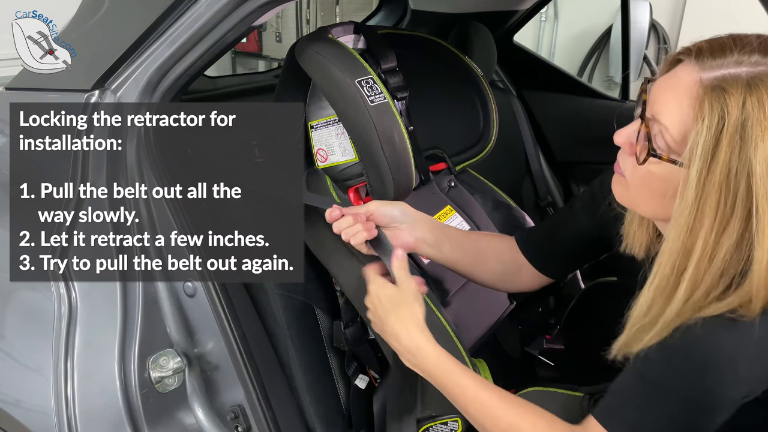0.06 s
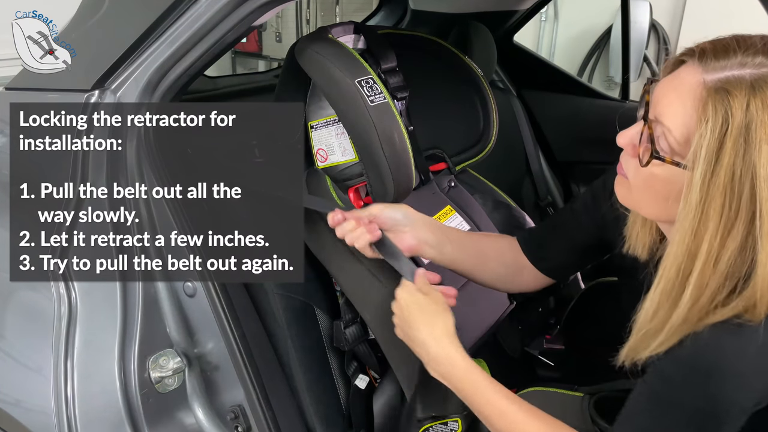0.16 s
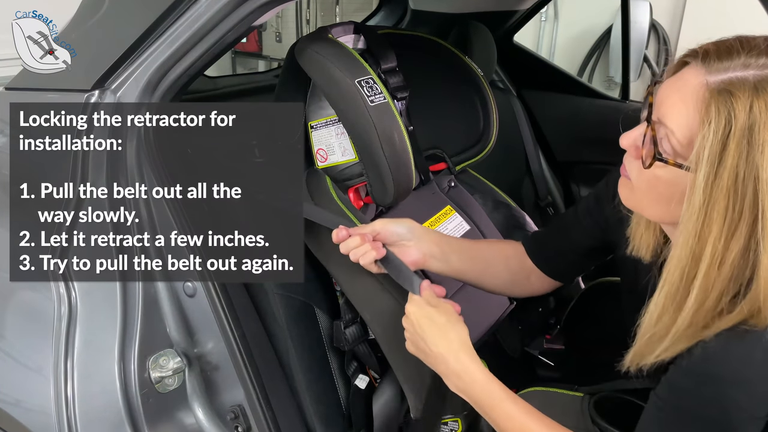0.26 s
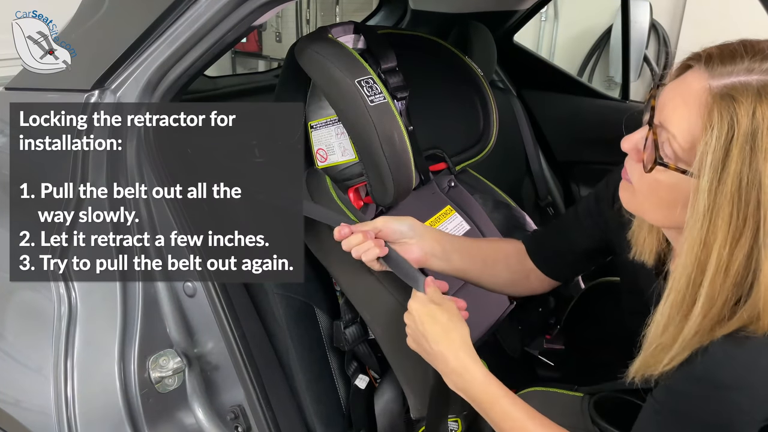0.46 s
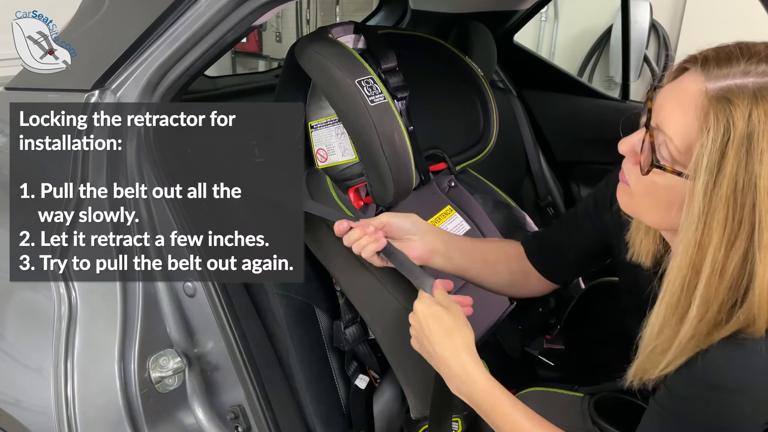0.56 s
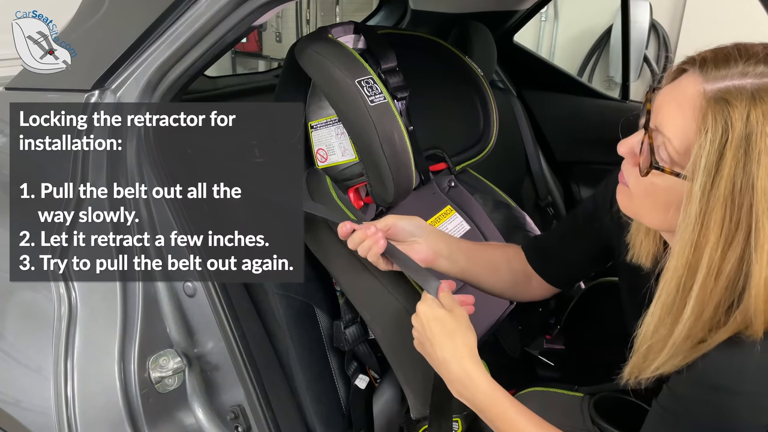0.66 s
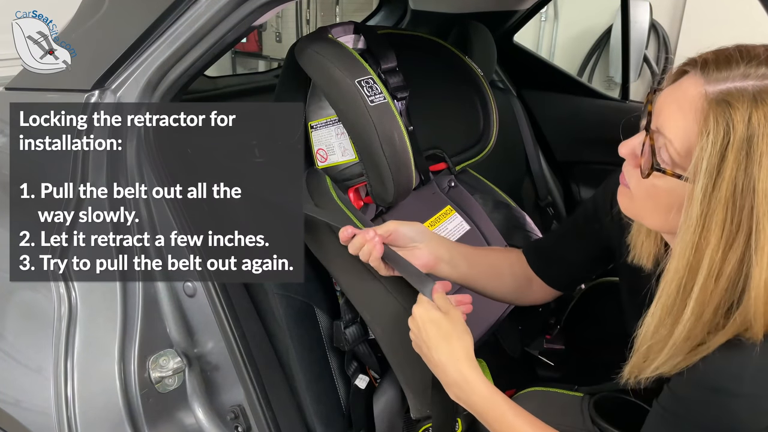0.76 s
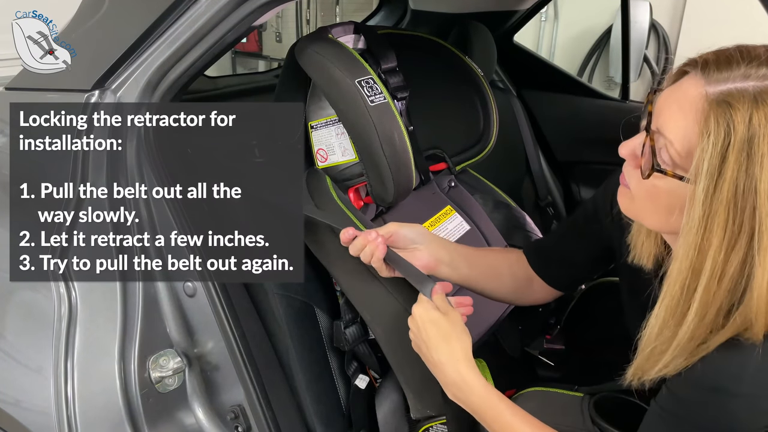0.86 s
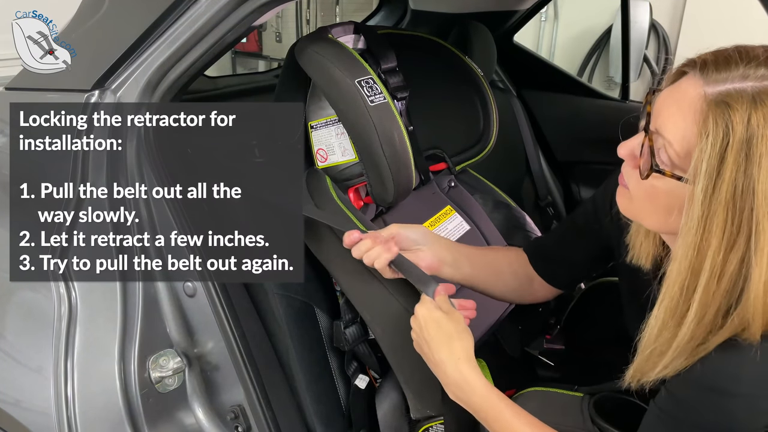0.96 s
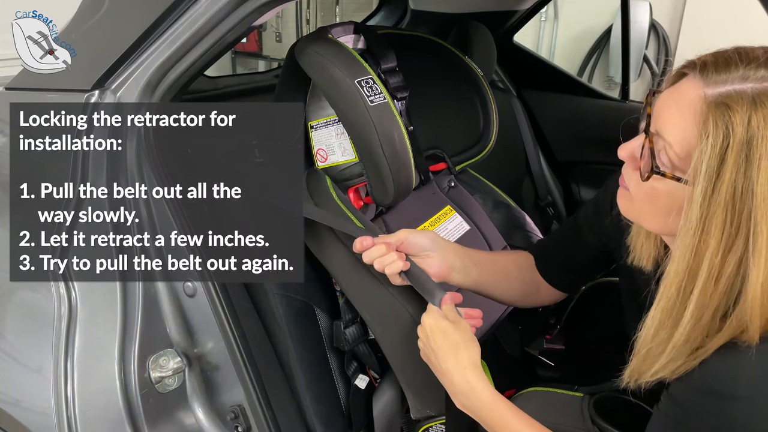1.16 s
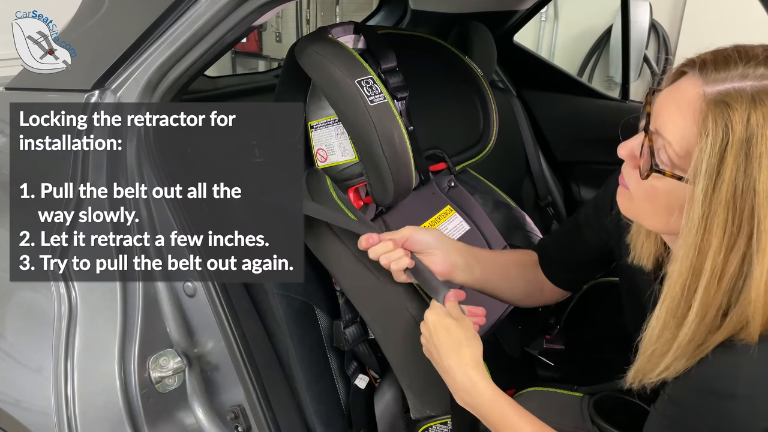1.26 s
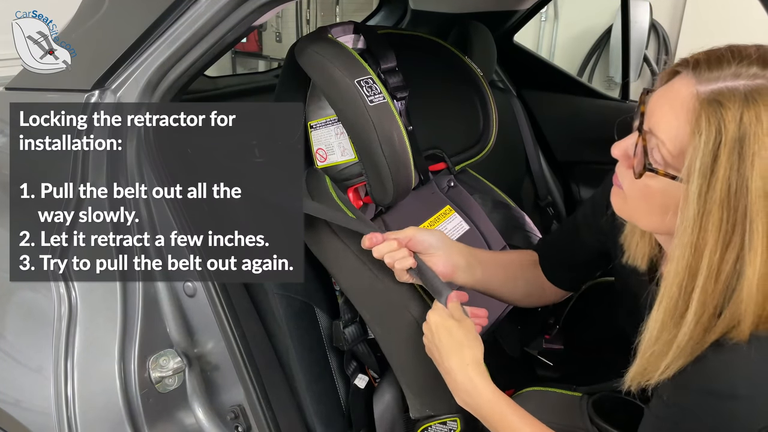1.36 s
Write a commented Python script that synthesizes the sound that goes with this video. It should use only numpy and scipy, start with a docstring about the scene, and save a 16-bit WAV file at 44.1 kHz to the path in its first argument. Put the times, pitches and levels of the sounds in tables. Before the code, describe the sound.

Seat belt tugged inside a parked car: sharp clack, short zip, dull clack.

```python
"""Inside a parked car, door open, one microphone close to a seat belt worked by hand.
The webbing goes taut against the trim with a soft thud and the retractor's pawl catches with a sharp
clack. A short length of belt zips through its guide as the spool turns, then a second tug seats the lock
with a duller clack. Cloth rustles faintly; a low rumble lies behind it all."""
import sys
import numpy as np
from scipy import signal
from scipy.fft import rfft, irfft
from scipy.io import wavfile

SR = 44100
rng = np.random.default_rng(int(sys.argv[2]) if len(sys.argv) > 2 else 0)


def store_wav(level_fs):
    """Save 16-bit WAV to argv[1]."""
    pcm = np.round(np.clip(np.atleast_2d(level_fs), -1, 1) * 32767)
    wavfile.write(sys.argv[1], SR, pcm.T.astype(np.int16))


N = 61739
T = np.arange(N) / SR

# Levels in the tables are relative; a spectrum gives the level per hertz.
# low rumble behind the scene: (frequency [Hz], level [dB])
RUMBLE_SPECTRUM = [(25, 0.5), (50, -6.5), (80, -5.5), (120, -7), (170, -16), (280, -18.5), (450, -28.5),
                   (1000, -33), (2000, -38), (5000, -43), (10000, -49), (16000, -52)]
# reverberation of the cabin and the space around it: (frequency [Hz], level [dB], t60 [s])
CABIN_REVERB = [(148, -2, .5), (420, -1, .5), (1040, -4.5, 0.56), (1640, -4.5, 0.59), (2920, -5, 0.55),
                (7400, -6, 0.31), (15000, -10, 0.21)]
# cloth sliding under the hands: (time [s], half-width [s], level [dB])
CLOTH_SWELLS = [(0.131, 0.026, -55.5), (.235, .028, -53), (0.533, 0.017, -60.5), (1.351, 0.017, -56)]
# its hiss: (frequency [Hz], level [dB])
CLOTH_SPECTRUM = [(500, 15), (2000, 2), (5000, 2), (10000, 3.5), (13000, -10), (15500, 2.5)]
# light ticks of the plastic fittings: (time [s], level [dB])
FITTING_TICKS = [(0.526, -50.5), (0.546, -51), (1.337, -47)]
# their colour: (frequency [Hz], level [dB])
TICK_SPECTRUM = [(800, 6), (3000, -0.5), (5500, -9), (8500, 4.5), (11000, -9), (15500, -3)]
# rumble of the turning spool: (time [s], level [dB])
SPOOL_LEVEL = [(.62, -28), (.685, -12.5), (.698, -0.5), (.73, -8), (.757, -1.5), (.79, -7), (.83, -6),
               (.9, -45)]
# its resonances: (frequency [Hz], level [dB], t60 [s])
SPOOL_MODES = [(166, -13, 0.053), (207, -4.5, .08), (279, -0.5, .08), (400, -7.5, 0.014),
               (597, -8.5, 0.021), (770, -3.5, 0.023), (1150, -5.5, 0.025)]
# thrum of the stretched webbing: (time [s], pitch [Hz], level [dB])
THRUM_CURVE = [(0.691, 290, -39), (0.717, 276.7, -33), (0.739, 216.4, -37.5), (0.758, 164, -26),
               (0.779, 166, -34), (0.828, 160, -39)]
# friction of the running belt, following its speed: (time [s], level [dB])
FRICTION_LEVEL = [(.66, -30), (.685, -18), (.708, -17.5), (.716, -2.5), (.765, 1.5), (.795, 0.5),
                  (.815, -4), (.835, -13), (.89, -62)]
# rasp of webbing on the guide: (frequency [Hz], level [dB])
WEBBING_SPECTRUM = [(400, 7.5), (900, 6), (1500, 7.5), (2600, -0.5), (2950, -9.5), (3600, 3.5),
                    (5800, -6.5), (7000, 0.5), (8800, -7), (10200, -4), (12000, -12.5), (14200, -19),
                    (15600, -9)]
# resonances of the guide: (frequency [Hz], level [dB], t60 [s])
GUIDE_MODES = [(1764, -9.5, 0.078), (2107, -4, 0.075), (2666, -4, 0.027), (3273, -3, 0.027),
               (3690, -9.5, 0.037), (4170, -6, 0.017), (5290, -4.5, 0.025), (6636, -4.5, 0.042),
               (7780, -5.5, 0.023), (9630, -6, .03)]
# belt going taut on the trim: (time [s], push level [dB], rattle level [dB], rattle low-pass [Hz])
TRIM_THUDS = [(0.2204, -5.5, -38, 6000), (.241, -11, -52, 3000), (0.695, -20.5, -33, 4000),
              (1.015, -24, -47, 1190), (1.0254, -3, -44.5, 1115), (1.044, -17, -54, 1000)]
# ring of the trim panel: (frequency [Hz], level [dB], t60 [s])
PANEL_MODES = [(183.4, 1, 0.14), (295, -11.5, 0.022), (411, -14, 0.09), (1117, -6.5, 0.044)]
# rattle of loose trim: (frequency [Hz], level [dB])
RATTLE_SPECTRUM = [(100, -26), (250, 12.5), (470, 1.5), (750, 5.5), (1150, -2), (1900, -13.5), (2650, -8.5),
                   (3300, -58), (12000, -38)]
# contacts of the lock as it seats: (time [s], level [dB])
LOCK_CONTACTS = [(1.0755, -7), (1.0852, -7), (1.0879, 2.5), (1.095, -8)]
# its ring: (frequency [Hz], level [dB], t60 [s])
LOCK_RING = [(117, -12.5, 0.22), (295, -8.5, 0.15), (420, -17.5, .16), (640, -13.5, 0.088), (725, -17, 0.3),
             (756, -0.5, 0.095), (1115, -1, 0.057), (2430, -8, 0.027), (3570, -12.5, 0.079)]
# its crack: (frequency [Hz], level [dB])
LOCK_SPECTRUM = [(120, 6), (330, 16.5), (520, 7), (720, 15.5), (1050, 5), (1500, 6.5), (2000, -2.5),
                 (2550, 1.5), (3000, -7.5), (3700, -4), (5500, -9.5), (10000, -18.5), (14000, -30),
                 (15800, -24)]
# contacts of the pawl on the ratchet: (time [s], level [dB])
PAWL_CONTACTS = [(.2593, -4), (.2621, -2.5), (.2656, -2.5), (.2726, -35), (.284, -13), (.298, -21)]
# its ring: (frequency [Hz], level [dB], t60 [s])
PAWL_RING = [(69.1, -15, 1), (210.4, -8, 0.73), (279.3, -12.5, 0.4), (647, -13, 0.027), (743, 0, 0.074),
             (1148, 3, 0.054), (1699, -12, 0.039), (1770, -26, 0.38), (2100, -21.5, 0.15),
             (2543, -6, 0.061), (2670, -5.5, 0.25), (7450, -13.5, 0.068), (9690, -4, 0.041),
             (12540, -6.5, 0.055)]
# its crack: (frequency [Hz], level [dB])
PAWL_SPECTRUM = [(100, 13), (250, 16), (430, 3), (600, 10.5), (950, 5.5), (1250, 9.5), (1800, 8),
                 (2650, 1.5), (3100, -1), (4300, -1), (6000, -7.5), (7400, 5.5), (10000, 0), (13000, -6),
                 (14200, -6), (15800, -13)]


def from_db(db):
    """Decibels to gain."""
    return 10 ** (np.asarray(db) / 20)


def rms_one(x):
    """Scale to unit rms."""
    return x / np.sqrt(np.mean(x ** 2) + 1e-20)


def at_hz(points, hz, column=1):
    """Read a table on a log-frequency axis."""
    table = np.array(points)
    return np.interp(np.log(np.maximum(hz, 1)), np.log(table[:, 0]), table[:, column])


def level(curve):
    """Gain along a dB curve, silent outside it."""
    s, db = np.transpose(curve)
    return from_db(np.interp(T, s, db)) * (T > s[0]) * (T < s[-1])


def burst(start_s, attack_s, t60):
    """Envelope that rises from start_s and dies away."""
    age = np.maximum(T - start_s, 0)
    return (1 - np.exp(-age / attack_s)) * np.exp(-np.log(1000) * age / t60)


def noise(spectrum):
    """Unit-rms noise of the given colour, above 20 Hz."""
    hz = np.arange(N + 1) * SR / (2 * N)
    white = rfft(rng.standard_normal(2 * N))
    return rms_one(irfft(white * from_db(at_hz(spectrum, hz)) * (hz > 20))[:N])


def soften(x, hz):
    """One-pole low-pass."""
    pole = np.exp(-2 * np.pi * hz / SR)
    return signal.lfilter([1 - pole], [1, -pole], x)


def wobble(hz):
    """Smooth random drift of unit rms."""
    return rms_one(soften(soften(rng.standard_normal(N), hz), hz))


def ring(x, hz, t60):
    """One mode: a unit click sets a sine of height 1 ringing."""
    radius, angle = from_db(-60 / (t60 * SR)), 2 * np.pi * hz / SR
    return signal.lfilter([0, np.sin(angle)], [1, -2 * radius * np.cos(angle), radius ** 2], x + 1e-18)


def strike(blows, modes):
    """Blows ring all the modes of a body, in alternating polarity."""
    return sum((-1) ** k * from_db(db) * ring(blows, hz, t60) for k, (hz, db, t60) in enumerate(modes))


def hum(modes):
    """Friction keeps a set of modes ringing."""
    return sum(from_db(db) * rms_one(ring(rng.standard_normal(N), hz, t60)) for hz, db, t60 in modes)


def background():
    """A steady low rumble around the car."""
    return from_db(-44) * noise(RUMBLE_SPECTRUM)


def cabin(x, build_s=0.0059):
    """Reflections reach the microphone as a diffuse tail; the treble dies first."""
    edges = np.geomspace(80, 18000, 17)  # about half an octave a band
    white, response = rng.standard_normal((2, N)), np.zeros(N)
    for k, (low, high) in enumerate(zip(edges, edges[1:])):
        hz = np.sqrt(low * high)
        decay = burst(0, build_s, t60=at_hz(CABIN_REVERB, hz, column=2))
        band = signal.sosfilt(signal.butter(2, [low, high], "band", fs=SR, output="sos"), white[k % 2])
        response += from_db(at_hz(CABIN_REVERB, hz)) * band * decay / np.sqrt(np.sum(decay ** 2))
    return signal.fftconvolve(x, response)[:N]


def cloth():
    """Cloth slides under the hands in brief swells of hiss."""
    swells = sum(from_db(db) * np.exp(-.5 * ((T - s) / width) ** 2) for s, width, db in CLOTH_SWELLS)
    return noise(CLOTH_SPECTRUM) * swells


def fittings():
    """The belt's plastic fittings give tiny clicks."""
    clicks = sum(from_db(db) * burst(s, attack_s=0.00024, t60=0.027) for s, db in FITTING_TICKS)
    return noise(TICK_SPECTRUM) * clicks


def spool():
    """The turning spool rumbles in its frame."""
    return from_db(-36) * level(SPOOL_LEVEL) * hum(SPOOL_MODES)


def thrum(pitch_jitter=0.0902, waver_db=1.5, waver_hz=50.3):
    """The free length of belt vibrates unsteadily, lower as more is paid out."""
    s, hz, db = np.transpose(THRUM_CURVE)
    pitch = np.interp(T, s, hz) * (1 + pitch_jitter * wobble(waver_hz))
    tone = np.sin(2 * np.pi * np.cumsum(pitch) / SR)
    return tone * level(np.c_[s, db]) * from_db(waver_db * wobble(waver_hz))


def webbing(grain_db=1, grain_hz=306):
    """The weave rasps over the guide in fine uneven grains and makes it sing."""
    rasp = rms_one(noise(WEBBING_SPECTRUM) * from_db(grain_db * wobble(grain_hz)))
    return level(FRICTION_LEVEL) * (from_db(-35.5) * rasp + from_db(-46) * hum(GUIDE_MODES))


def thuds(contact_s=0.00017):
    """The tightening belt gives the panel a soft push and shakes the loose trim."""
    pushes = sum(from_db(db) * burst(s, contact_s, contact_s * np.log(1000))
                 for s, db, _, _ in TRIM_THUDS)
    push_area = contact_s * SR / 2
    panel = from_db(-25.5) * strike(pushes / push_area, PANEL_MODES)
    rattle = noise(RATTLE_SPECTRUM)
    shaking = sum(from_db(db) * burst(s, attack_s=0.0023, t60=0.17) * soften(rattle, hz)
                  for s, _, db, hz in TRIM_THUDS)
    return panel + shaking


def clack(hits, modes, spectrum, ring_db, crack_db, attack_s, crack_t60,
          chatter_db, chatter_hz, chatter_t60):
    """Each contact gives a crack, a duller chatter of loose parts and a ring; returns (noise, ring)."""
    def contact_noise(t60):
        power = sum((from_db(db) * burst(s, attack_s, t60)) ** 2 for s, db in hits)
        return noise(spectrum) * np.sqrt(power)

    crack = from_db(crack_db) * contact_noise(crack_t60)
    chatter = from_db(chatter_db) * soften(contact_noise(chatter_t60), chatter_hz)
    blows = sum(from_db(db) * signal.unit_impulse(N, int(s * SR)) for s, db in hits)
    return crack + chatter, from_db(ring_db) * strike(blows, modes)


def lock():
    """Under a firm tug the lock seats with a dull clack."""
    return clack(LOCK_CONTACTS, LOCK_RING, LOCK_SPECTRUM, ring_db=-26,
                 crack_db=-25.5, attack_s=0.0014, crack_t60=0.052,
                 chatter_db=-37, chatter_hz=6000, chatter_t60=0.16)


def pawl():
    """The pawl snaps sharply onto the ratchet and bounces."""
    return clack(PAWL_CONTACTS, PAWL_RING, PAWL_SPECTRUM, ring_db=-26,
                 crack_db=-16.5, attack_s=0.0011, crack_t60=0.041,
                 chatter_db=-33.5, chatter_hz=3000, chatter_t60=0.37)


def scene():
    """At the microphone, in mono: belt and retractor up close, cabin and rumble behind."""
    pawl_noise, pawl_ring = pawl()
    lock_noise, lock_ring = lock()
    noises = pawl_noise + lock_noise + fittings() + thuds() + webbing() + spool()
    rings = pawl_ring + lock_ring + thrum()
    reverb = cabin(noises + from_db(-9) * rings)  # the rings carry into the cabin less than the cracks
    return (noises + rings + reverb + cloth() + background())[None]


def record(dry, cutoff_hz=15800):
    """A steep low-pass takes off the very top."""
    return signal.sosfilt(signal.ellip(12, .1, 80, cutoff_hz, fs=SR, output="sos"), dry)


dry = scene()
out = record(dry)
store_wav(out)
```